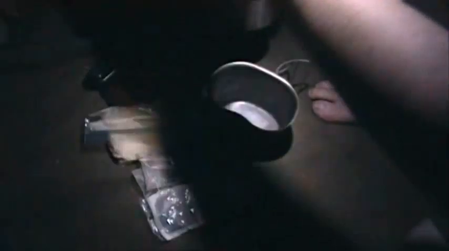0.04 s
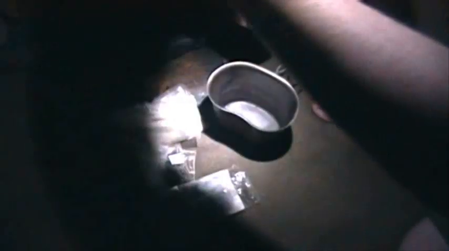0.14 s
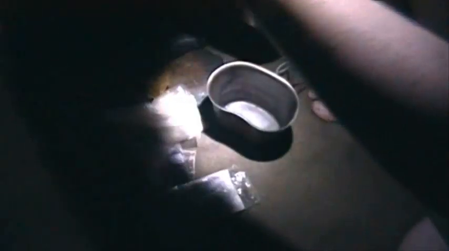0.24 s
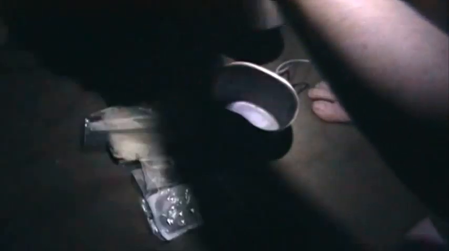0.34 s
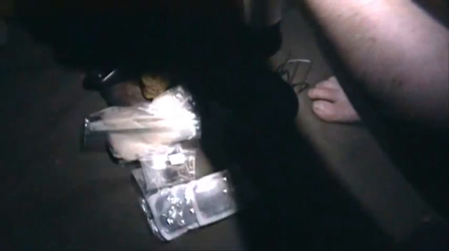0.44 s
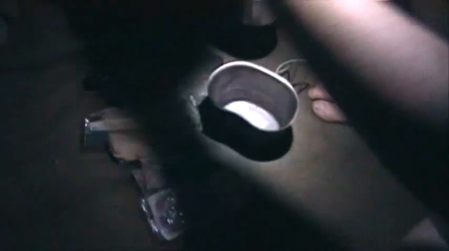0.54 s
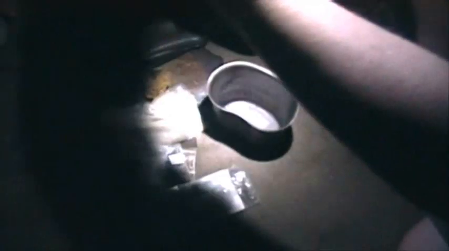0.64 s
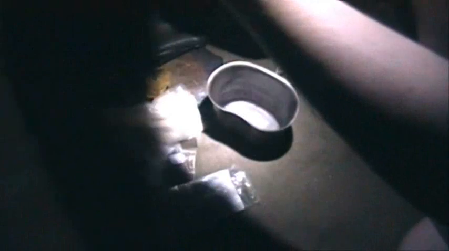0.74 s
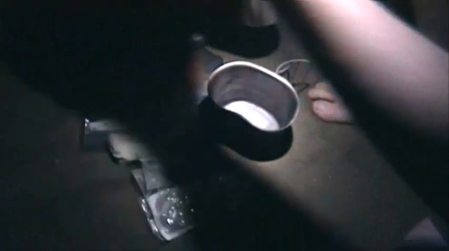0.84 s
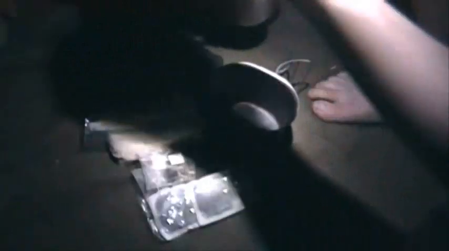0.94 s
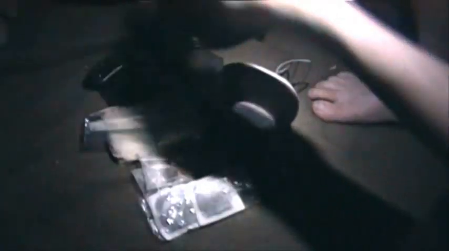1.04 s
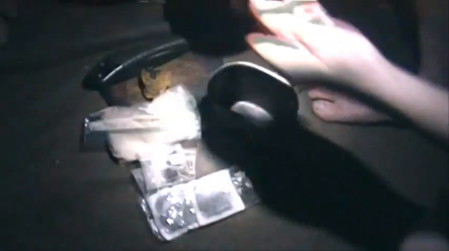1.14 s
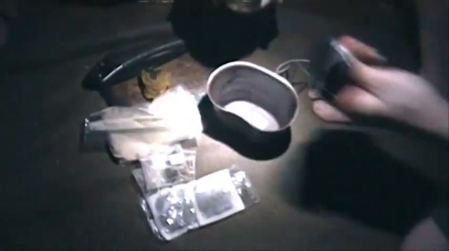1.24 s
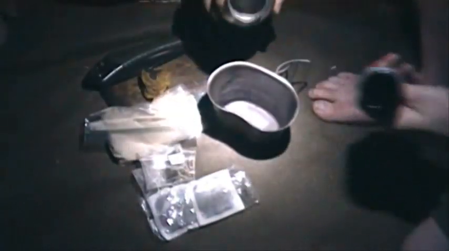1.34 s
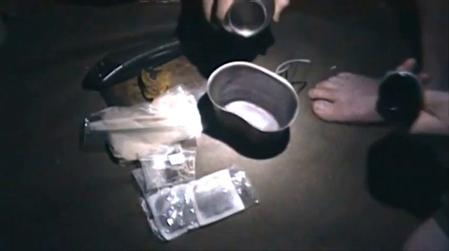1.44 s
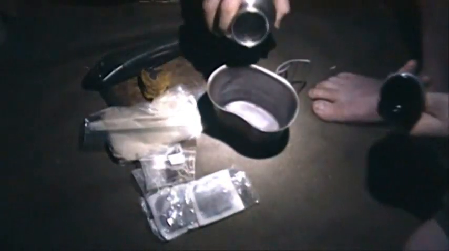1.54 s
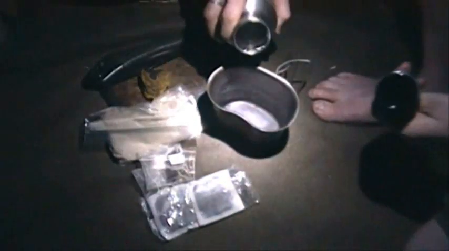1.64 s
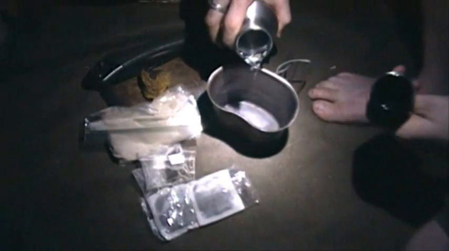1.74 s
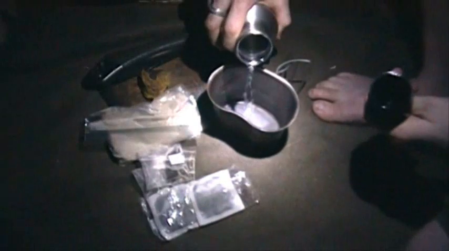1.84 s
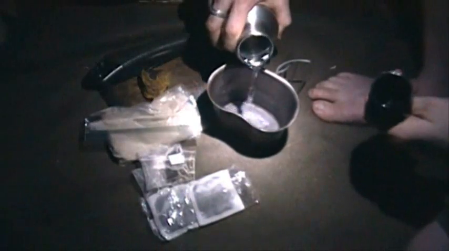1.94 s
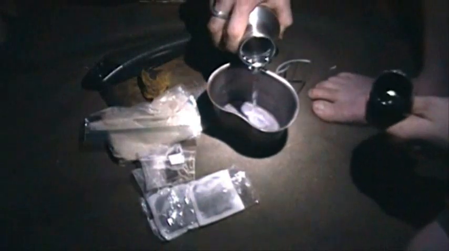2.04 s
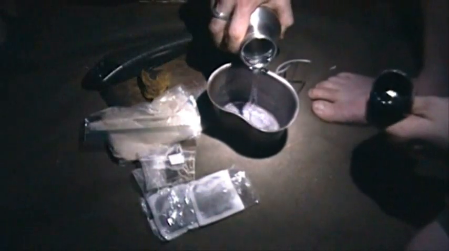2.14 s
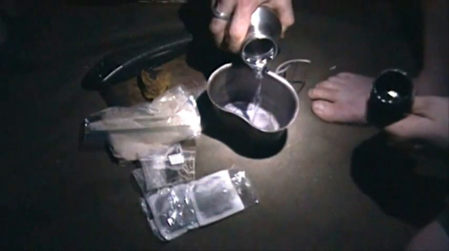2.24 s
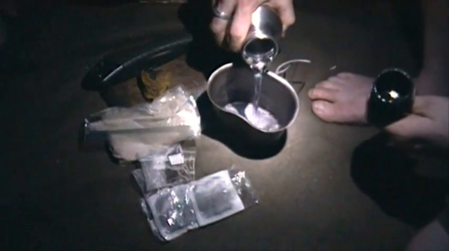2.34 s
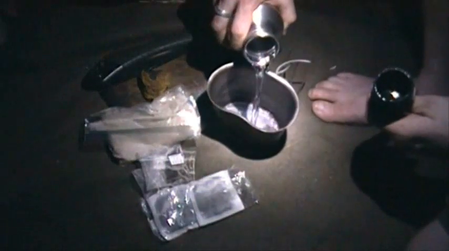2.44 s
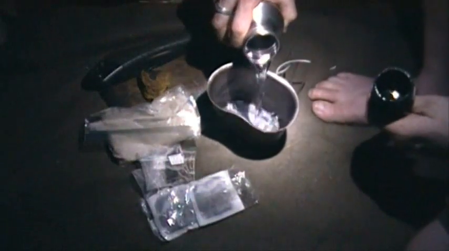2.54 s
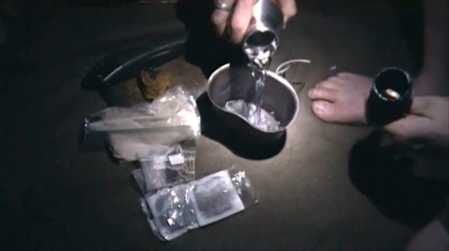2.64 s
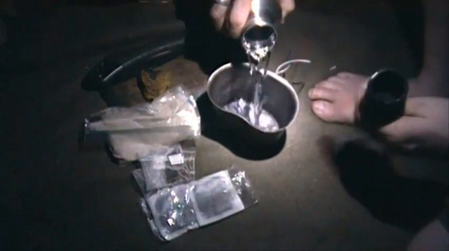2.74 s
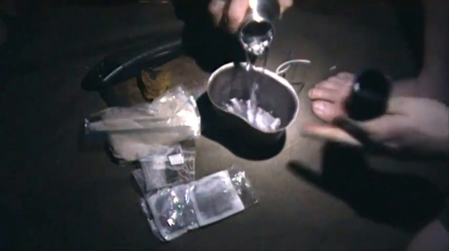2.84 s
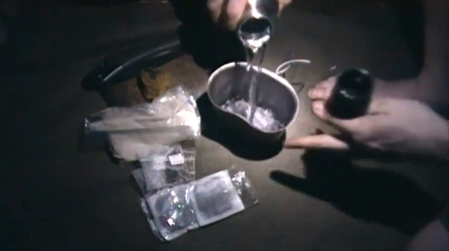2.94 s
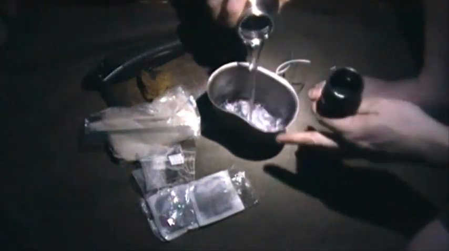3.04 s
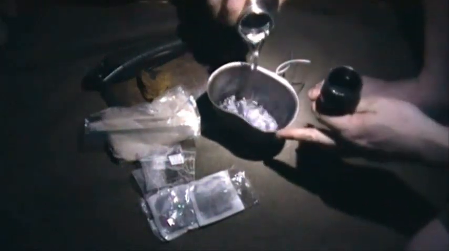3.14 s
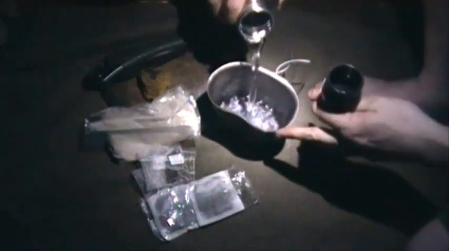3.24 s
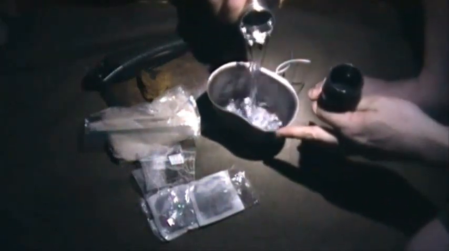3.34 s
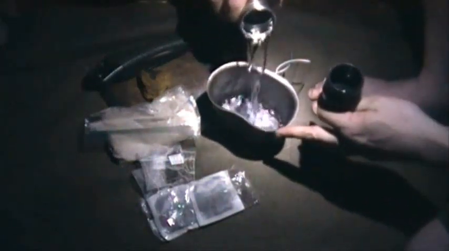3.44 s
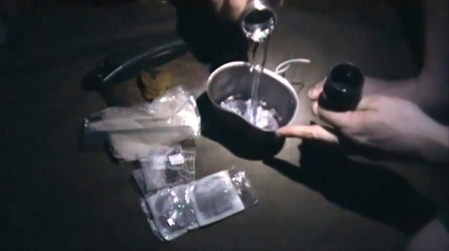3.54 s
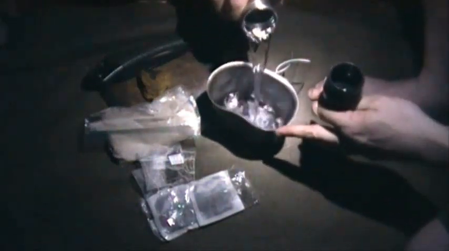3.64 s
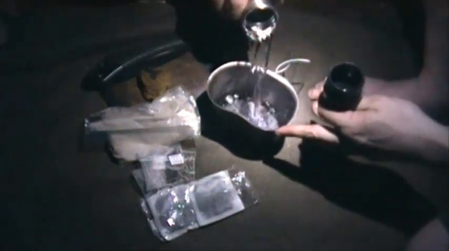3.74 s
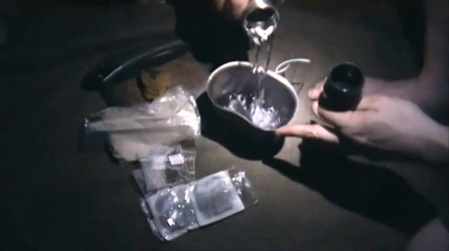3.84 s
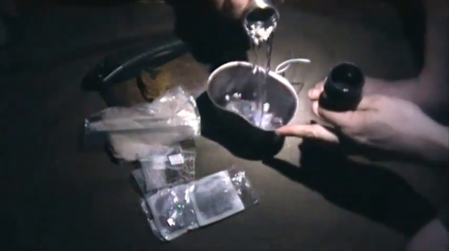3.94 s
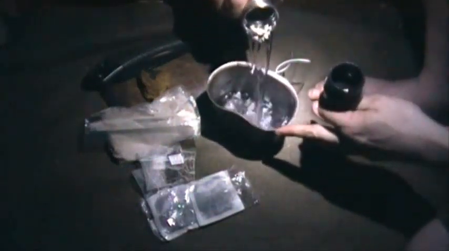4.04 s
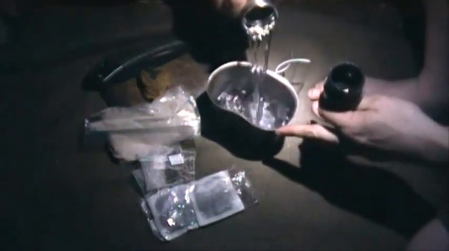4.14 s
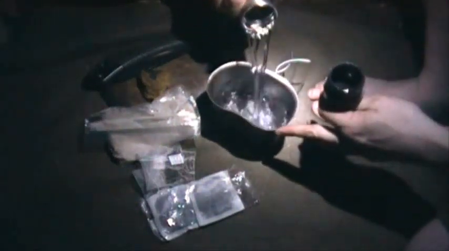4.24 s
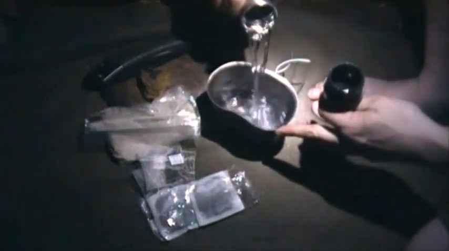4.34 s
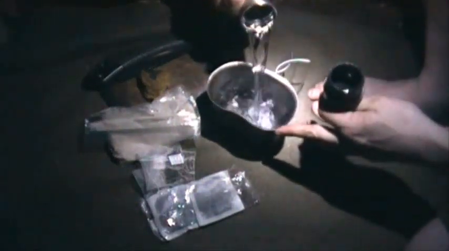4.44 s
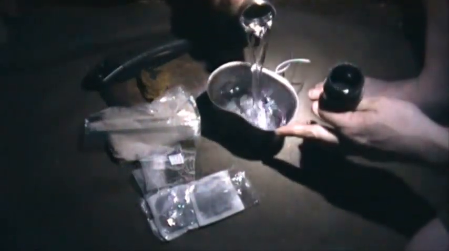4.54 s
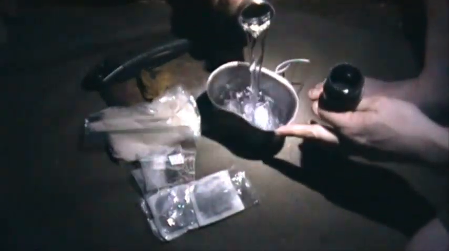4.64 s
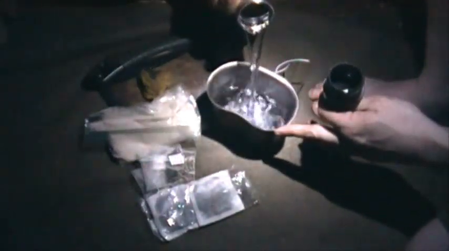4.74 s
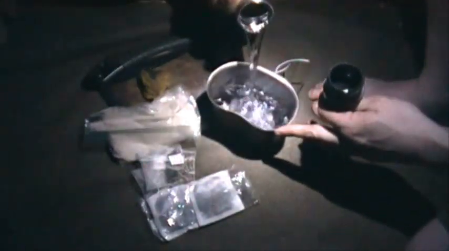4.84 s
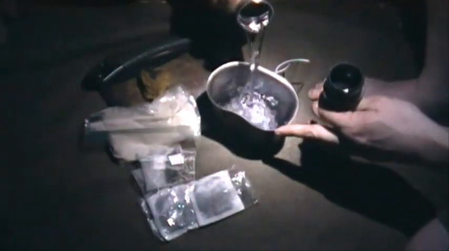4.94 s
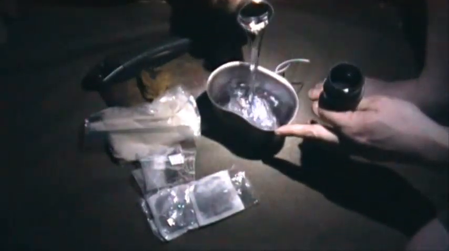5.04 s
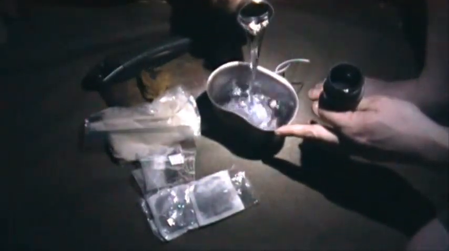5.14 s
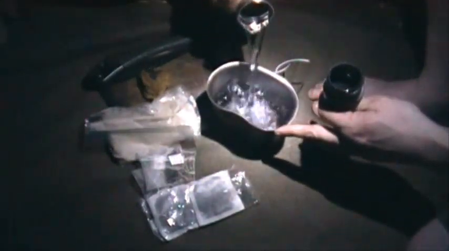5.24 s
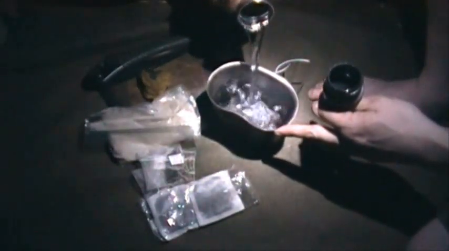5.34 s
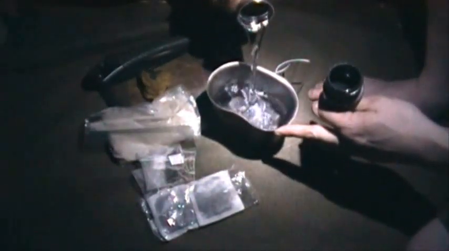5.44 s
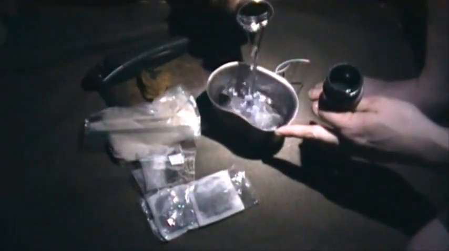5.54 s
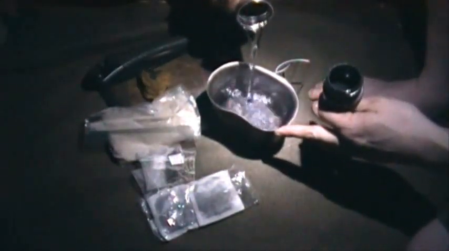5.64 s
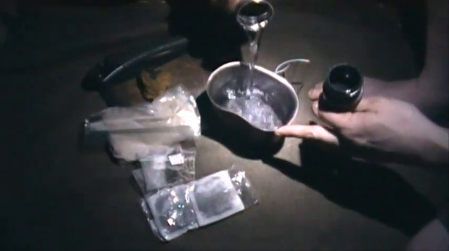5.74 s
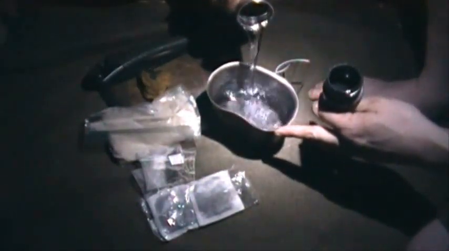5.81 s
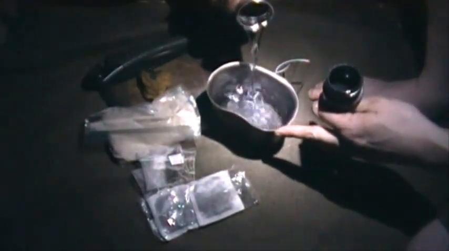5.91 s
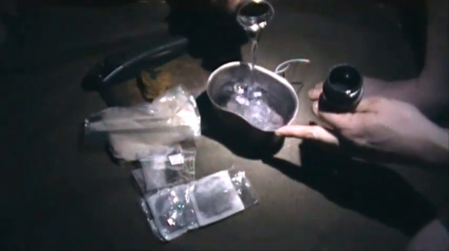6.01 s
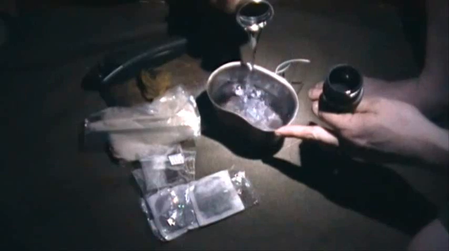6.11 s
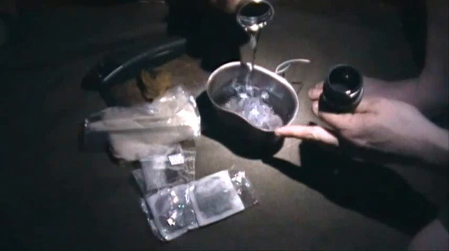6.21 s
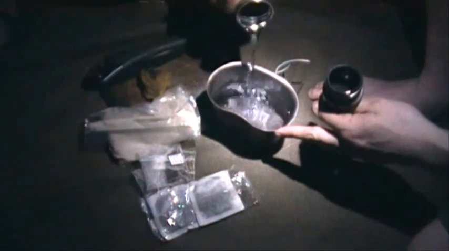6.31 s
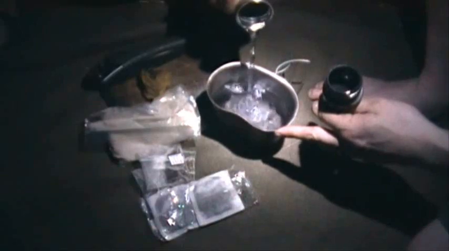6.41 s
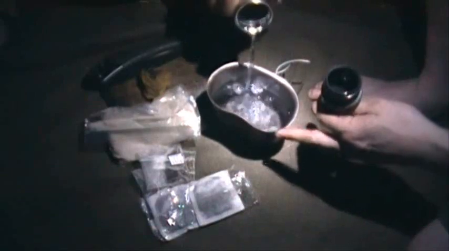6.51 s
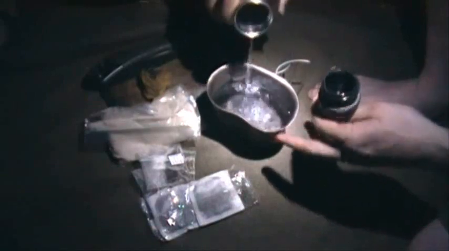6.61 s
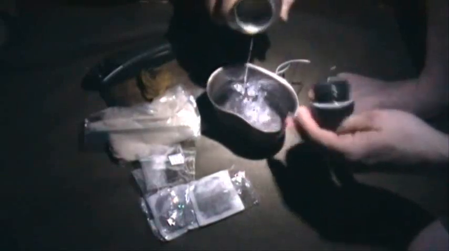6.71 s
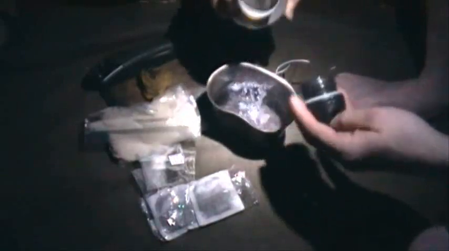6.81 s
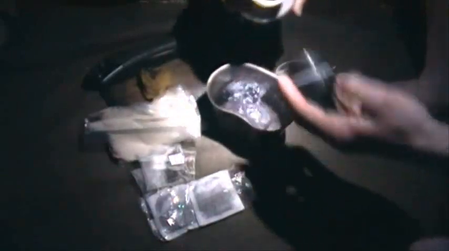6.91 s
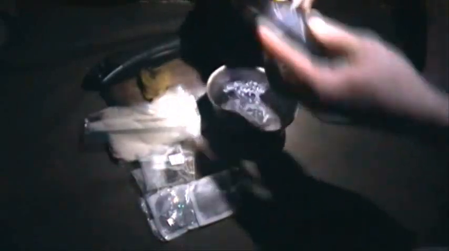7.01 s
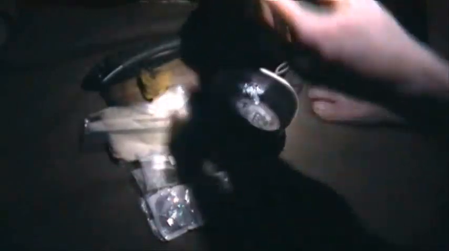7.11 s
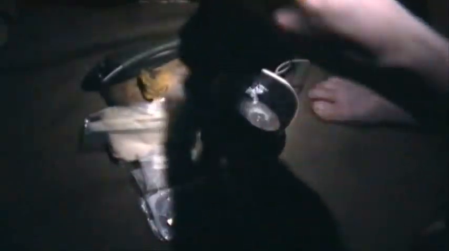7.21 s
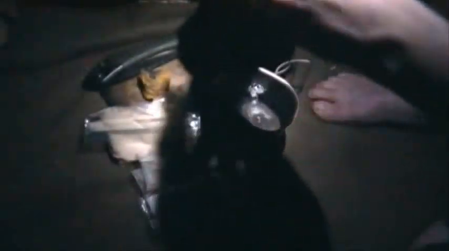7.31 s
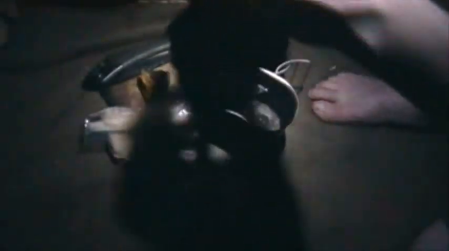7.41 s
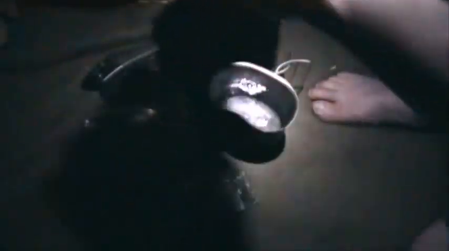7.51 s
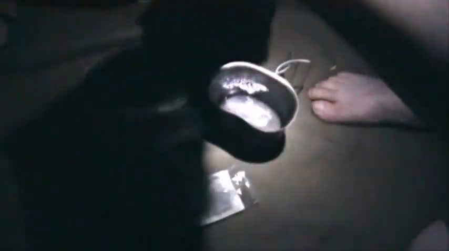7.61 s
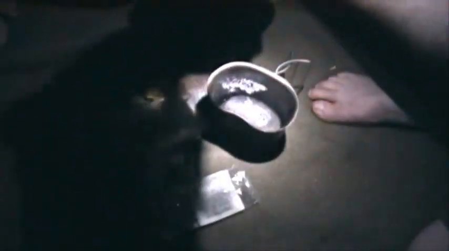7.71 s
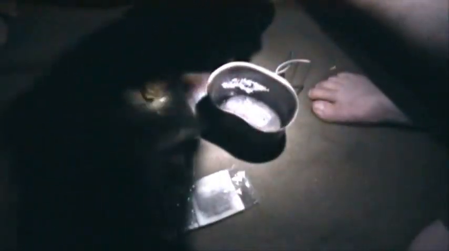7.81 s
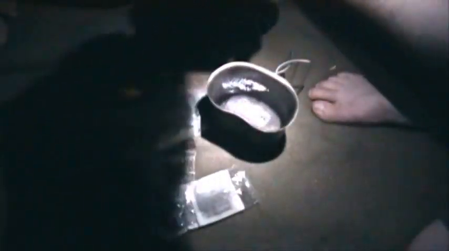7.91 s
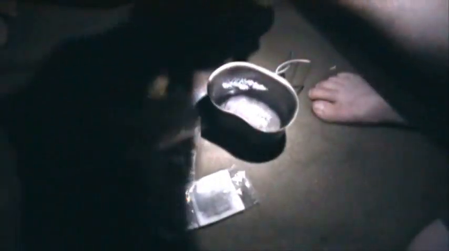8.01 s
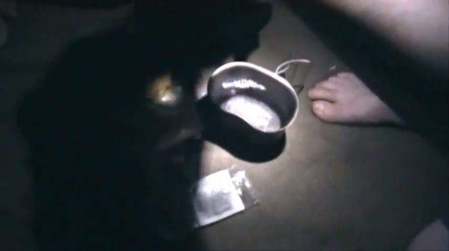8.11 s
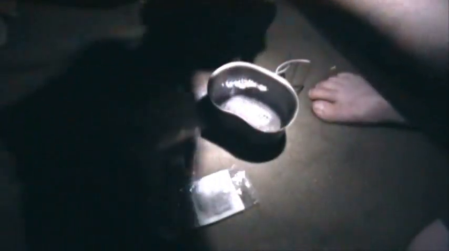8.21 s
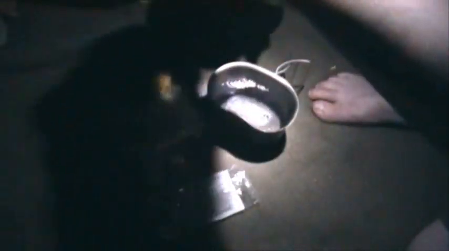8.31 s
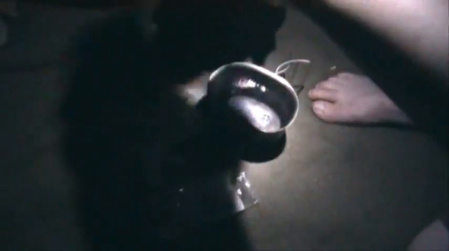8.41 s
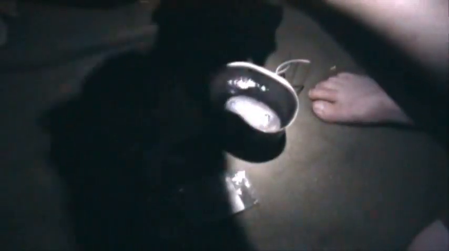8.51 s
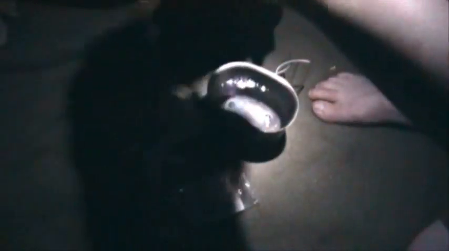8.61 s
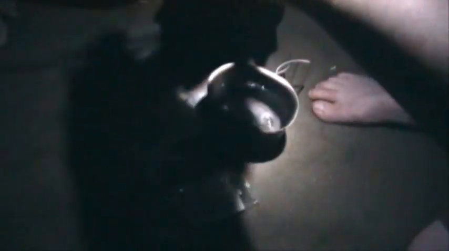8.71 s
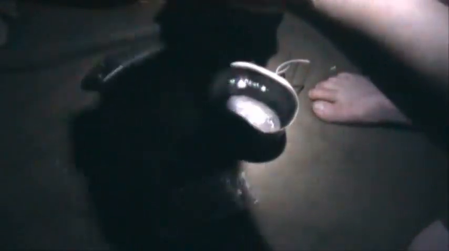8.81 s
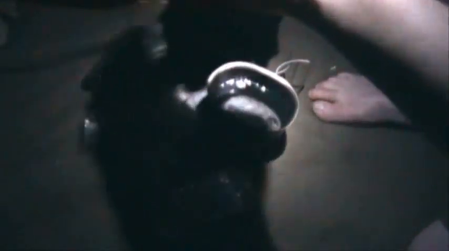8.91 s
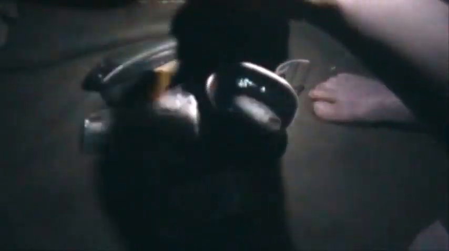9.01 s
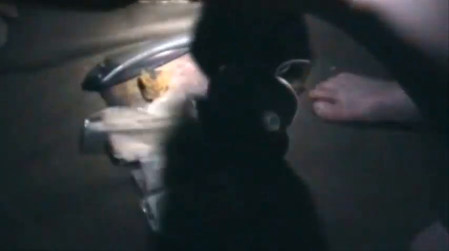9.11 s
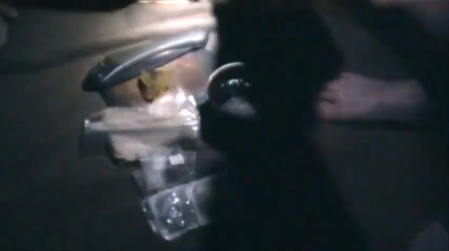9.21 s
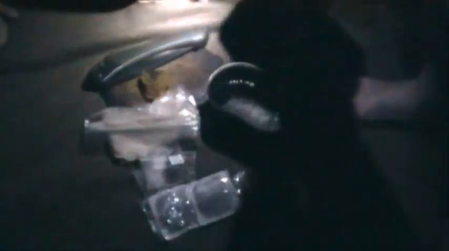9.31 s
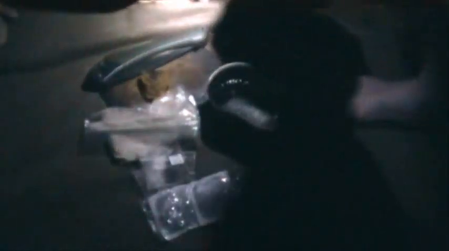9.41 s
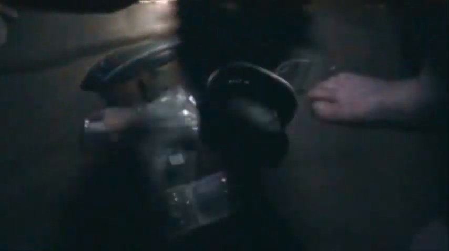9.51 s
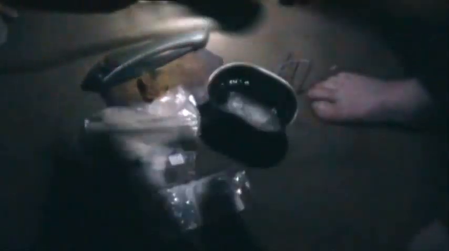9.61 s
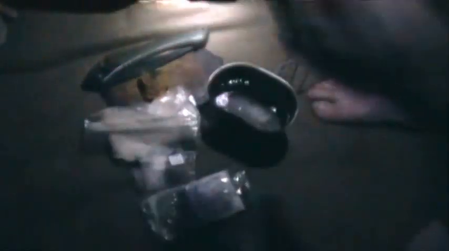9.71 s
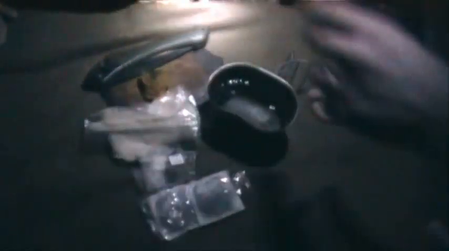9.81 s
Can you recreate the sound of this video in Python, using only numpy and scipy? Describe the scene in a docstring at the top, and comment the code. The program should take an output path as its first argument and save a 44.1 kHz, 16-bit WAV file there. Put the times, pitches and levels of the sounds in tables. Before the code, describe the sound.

Close up in a quiet tent, a steel bottle is opened, water spatters and gurgles into a metal cup, and the stopper is screwed back tight.

```python
"""In a tent at night a stopper is unscrewed from a steel bottle and pops out, and water is poured into a metal cup.
The stream spatters on the bare bottom, then burbles higher as the cup fills, while a low drone swells and fades.
The stopper is pushed back in with a hollow, sinking note, screwed down, and creaks tight.
Noise bursts and decaying sines make the metal, swarms of short sines the water, filtered noise the night."""
import sys
import numpy as np
from scipy import signal
from scipy.fft import rfft, irfft, next_fast_len
from scipy.io import wavfile
from scipy.ndimage import uniform_filter1d

SR = 44100
rng = np.random.default_rng(int(sys.argv[2]) if len(sys.argv) > 2 else 0)


def wav_out(sig):
    """Save sig, one row per channel (or a flat mono array), as 16-bit PCM at SR to the path in sys.argv[1]."""
    wavfile.write(sys.argv[1], SR, np.round(np.clip(np.atleast_2d(sig).T, -1, 1) * 32767).astype(np.int16))


N = 434826
TIME = np.arange(N) / SR
CUTOFF_HZ = 15700   # top of the final sound and of the bubble pitches
LEVEL_SPAN_S = 0.01


def from_db(db):
    """Decibels to gain."""
    return 10 ** (np.asarray(db) / 20)


def rms_one(x):
    """Scale to rms 1."""
    return x / np.sqrt(np.mean(x ** 2) + 1e-20)


def unit_burst(x):
    """Scale a short sound to the energy of rms 1 held for LEVEL_SPAN_S."""
    return x * np.sqrt(LEVEL_SPAN_S * SR / (np.sum(x ** 2) + 1e-20))


def in_time(rows):
    """The columns of a curve at every sample."""
    s, *columns = np.transpose(rows)
    return [np.interp(TIME, s, c) for c in columns]


def ramp(start_s, length_s):
    """Rise from 0 to 1 over this stretch of time."""
    return np.clip((TIME - start_s) / max(length_s, 1e-3), 0, 1)


def at_hz(points, hz):
    """Read a spectrum on a log-frequency axis."""
    point_hz, values = np.transpose(points)
    return np.interp(np.log(np.maximum(hz, 1)), np.log(point_hz), values)


def band(x, low_hz, high_hz, order=2):
    """Butterworth band-pass."""
    edges = [low_hz, min(high_hz, 0.45 * SR)]
    return signal.sosfilt(signal.butter(order, edges, "band", fs=SR, output="sos"), x + 1e-18)


def coloured(x, spectrum):
    """Pass through a short minimum-phase filter with this spectrum."""
    size = 1024
    hz = np.arange(size // 2 + 1) * SR / size
    cepstrum = irfft(np.log(from_db(at_hz(spectrum, hz))))
    # folding the cepstrum forward in time makes the filter causal
    fold = np.r_[1, np.full(size // 2 - 1, 2), np.zeros(size // 2)]
    taps = irfft(np.exp(rfft(cepstrum * fold)))
    return signal.oaconvolve(x, taps)[:N]


def drift(rate):
    """Random wander between normal draws, `rate` of them a second."""
    return np.interp(TIME * rate, np.arange(32768), rng.standard_normal(32768))


def dying(t, t60):
    """Envelope that falls 60 dB in t60."""
    return np.exp(-np.log(1000) * t / t60)


def ring(clicks, hz, t60):
    """Two-pole resonator: a unit click sets a decaying sine of height 1 ringing."""
    r, w = from_db(-60 / (t60 * SR)), 2 * np.pi * hz / SR
    return signal.lfilter([0, np.sin(w)], [1, -2 * r * np.cos(w), r * r], clicks + 1e-18)


def add(out, s, sound):
    """Mix a sound in at time s."""
    i = max(int(s * SR), 0)
    out[i:i + len(sound)] += sound[:max(N - i, 0)]


def evened(x, span_s):
    """Hold the slow level near rms 1 and keep the fine grain."""
    power = np.maximum(uniform_filter1d(x ** 2, int(span_s * SR)), 0)
    return x / np.sqrt(power + 0.01 * np.mean(x ** 2))


def grains(per_s, spread_db, clump_db):
    """Random clicks of uneven size and sign, with loudness that clumps."""
    size_db = spread_db * np.minimum(rng.exponential(1, N), 4) + clump_db * drift(110)
    sizes = from_db(size_db) * rng.choice([-1, 1], N)
    return sizes * (rng.random(N) < per_s / SR)


# background spectrum: f/Hz, density level/dB
NIGHT_SPECTRUM = [(12, -40), (20, -9), (70, -0.5), (98, -4), (140, -6.5), (252, -17), (282, -17),
                  (667, -23), (1200, -24), (2090, -28.5), (3080, -30), (4430, -30), (7310, -31.5),
                  (7950, -31), (15500, -43)]
# how alike left and right are: f/Hz, likeness (0 to 1)
NIGHT_LIKENESS = [(25, .55), (60, 0.87), (150, 0.97), (380, 0.73), (950, 0.71), (2380, 0.48), (5980, 0.47),
                  (15000, 0.61)]


def night(level_db):
    """Steady distant rumble and hiss, shaped noise that is less alike left and right in the treble."""
    size = next_fast_len(N)
    hz = np.arange(size // 2 + 1) * SR / size
    mid, side = rfft(rng.standard_normal((2, size))) * from_db(at_hz(NIGHT_SPECTRUM, hz))
    alike = np.clip(at_hz(NIGHT_LIKENESS, hz), -1, 1)
    both = np.sqrt(1 + alike) * mid + np.sqrt(1 - alike) * side * [[1], [-1]]
    balance_db = np.array([[-1.2], [1.0]])   # left, right
    return from_db(level_db + balance_db) * rms_one(irfft(both, size)[:, :N])


# limits of the thud, body, snap and fizz bands: f/Hz
CONTACT_BANDS = [250, 900, 2500, 8050, 15500]


def contact(levels_db, swell_s, t60, tail_db, tail_t60, grit_db):
    """A rough contact: a gritty crunch that swells, breaks off and leaves a short tail in the shell."""
    t = np.arange(SR // 9) / SR
    after = np.maximum(t - swell_s, 0)
    swell = np.minimum(t / max(swell_s, 1e-4) + 0.41, 1)
    shape = swell * (dying(after, t60) + from_db(tail_db) * dying(after, tail_t60))
    catches = np.interp(t / t[-1], np.linspace(0, 1, 300), rng.standard_normal(300))
    grit = from_db(grit_db * catches * dying(t, 0.33))
    forces = rng.standard_normal((len(levels_db), len(t))) * shape * grit
    crunch = np.zeros(len(t))
    for force, db, low, high in zip(forces, levels_db, CONTACT_BANDS, CONTACT_BANDS[1:]):
        crunch += from_db(db) * unit_burst(band(force, low, high, order=4))
    return crunch


# stopper and bottle knocking together:
# t/s, level/dB before trims, hardness/dB per band, swell/s, ring f/Hz, ring level/dB
STOPPER_KNOCKS = [(0.099, -34, -11, .0011, 1810, -28), (0.121, -34, -5, 0.0021, 1790, -34),
                  (0.146, -15.5, -2, .004, 3720, -20), (0.248, -17, .5, .002, 2860, -22),
                  (0.357, -35, -5, 0.0015, 1800, -37), (0.384, -44, 2, .0006, 4200, -28.5),
                  (0.41, -21.5, -0.5, 0.0031, 1753, -24), (0.511, -31, -4.5, 0.0011, 2880, -36),
                  (0.609, -24.5, -4.5, 0.0047, 1180, -34), (0.648, -14.5, -3.5, 0.0036, 1780, -16),
                  (0.6566, -17.5, 6, 0.0012, 3200, -20), (0.736, -24, -3, 0.0016, 1890, -35),
                  (0.823, -33.5, -5, 0.0018, 2190, -31), (1.081, -20.5, 3.5, .003, 5480, -29),
                  (1.132, -20.5, -0.5, 0.0013, 2940, -20), (1.186, -19, 2, 0.0025, 1770, -14),
                  (1.262, -25.5, -1.5, 0.00035, 1760, -32), (1.896, -42.5, 6, .0014, 3160, -47),
                  (2.232, -35, -1, 0.0025, 1980, -54), (7.252, -25, 5, .003, 3300, -28),
                  (7.412, -14, -6, 0.0011, 1125, -16), (7.462, -37, -5, 0.0046, 695, -32),
                  (7.621, -16.5, -5.5, 0.0016, 1350, -23), (7.736, -13, 2, .0065, 3400, -21),
                  (7.94, -40, -3, .002, 1150, -41), (8.164, -37, -3, 0.002, 1116, -46),
                  (8.534, -28.5, 0.5, .0008, 1590, -38), (8.543, -20.5, 0, .0056, 3010, -35),
                  (8.636, -13, -2, .0004, 3800, -22), (8.755, -33, -5, 0.0002, 1105, -35),
                  (8.792, -18, 7.5, .0014, 7000, -26), (8.886, -30, -2, 0.0006, 2160, -48),
                  (8.921, -27.5, -4, .0057, 1094, -29), (8.947, -19.5, 1, 0.0015, 2040, -24),
                  (8.968, -16.5, 1, 0.002, 1107, -27), (9.151, -12.5, .5, .0012, 1124, -20),
                  (9.17, -23, -3, .0004, 1120, -38), (9.196, -18, 0.5, 0.0019, 1550, -26),
                  (9.794, -27.5, -1, 0.0016, 1300, -32)]
# thud, body, snap and fizz of a knock of middling hardness: relative level/dB
KNOCK_BALANCE = [-10.5, -1.5, 0.5, -13.5]
# what the bottle rings with: f/Hz, relative level/dB, t60/s
BOTTLE_MODES = [(444, -2.5, 0.1), (688, -6.5, 0.14), (907, -12, 0.053), (1090, -8, 0.062),
                (1380, -17, 0.52), (1570, -20.5, 0.5), (1770, -6.5, 0.15), (1970, -13, .15),
                (2300, -12, 0.15), (2700, -23, 0.12), (2940, -7, 0.092), (3500, -0.5, 0.089),
                (4050, 3, 0.075), (4830, 0, 0.071), (5400, -7, 0.071), (6300, -12, 0.057), (7360, -16, .07)]


def knocks(crunch_db, main_cycles, shell_db):
    """Each knock crunches, brighter if harder, rings a pitch set by where it touches, and wakes the bottle's modes."""
    out, t = np.zeros(N), np.arange(SR // 4) / SR
    modes = np.array([from_db(db) * np.sin(2 * np.pi * hz * t) * dying(t, t60)
                      for hz, db, t60 in BOTTLE_MODES])
    # hardness tilts the bands about a pivot just above the body band, towards the snap
    bands_from_pivot = np.arange(len(KNOCK_BALANCE)) - (len(KNOCK_BALANCE) - 1.5) / 2
    for s, db, hardness_db, swell_s, hz, ring_db in STOPPER_KNOCKS:
        levels_db = db + np.array(KNOCK_BALANCE) + hardness_db * bands_from_pivot
        crunch = contact(levels_db, swell_s, t60=0.026, tail_db=-12, tail_t60=0.07, grit_db=3.5)
        add(out, s, from_db(crunch_db) * crunch)
        main_ring = unit_burst(np.sin(2 * np.pi * hz * t) * dying(t, main_cycles / hz))
        add(out, s + swell_s / 2, from_db(ring_db) * main_ring)
        strengths = rng.uniform(0.6, 1, len(modes)) * rng.choice([-1, 1], len(modes))
        add(out, s + swell_s, from_db(levels_db[1] + shell_db) * (strengths @ modes))
    return out


# twists of the hand on stopper and bottle: start t/s, length/s, level/dB before trims
HAND_TWISTS = [(.11, .14, -33), (.32, 0.13, -37), (.54, 0.07, -33.5), (1.004, 0.18, -33.5),
               (7.43, 0.2, -38), (7.79, 0.23, -39.5), (8.267, 0.15, -42), (8.562, 0.072, -33),
               (8.88, 0.11, -29)]
# spectrum of the rub: f/Hz, density level/dB
RUB_SPECTRUM = [(200, 5), (450, -1.5), (900, 1), (1800, 1.5), (4000, 0.5), (7500, 2), (10000, -11.5),
                (15500, -8)]
TWIST_ATTACK_S, TWIST_RELEASE_T60_S = 0.036, 0.19
# faint rustle while the hand rests on the stopper
GRIP_DB, HAND_OFF_S, HAND_ON_S = -50.5, 1.28, 7.5


def rubbing(level_db, shell_db):
    """With each twist, fine catches of hand and stopper hiss and keep the bottle's modes faintly ringing."""
    pressure = from_db(GRIP_DB) * ((TIME < HAND_OFF_S) | (TIME > HAND_ON_S))
    for s, length_s, db in HAND_TWISTS:
        release = dying(np.clip(TIME - s - length_s, 0, 1), TWIST_RELEASE_T60_S)
        pressure = np.maximum(pressure, from_db(db) * ramp(s, TWIST_ATTACK_S) * release)
    catches = coloured(grains(per_s=8300, spread_db=3.0, clump_db=3.5), RUB_SPECTRUM)
    rub = pressure * rms_one(band(catches, 210, 17000))
    shell = sum(from_db(db) * ring(rub, hz, t60) for hz, db, t60 in BOTTLE_MODES if hz < 3000)
    return from_db(level_db) * rub + from_db(shell_db) * shell


# low, quickly damped tones, many sounding under the stopper knocks: t/s, approximate peak level/dB, f/Hz, t60/s
DAMPED_TONES = [(0.411, -31, 415, .09), (0.652, -22, 200, .04), (3.385, -25.5, 45, 0.095),
                (4.419, -25, 32, 0.13), (4.505, -24, 42, 0.17), (4.507, -33, 470.6, 0.09),
                (4.706, -26, 472, 0.063), (7.413, -15, 860, .04), (7.622, -19, 800, .04),
                (8.168, -37.5, 658.6, 0.094), (8.545, -27.5, 645, .09), (8.636, -26, 180, 0.05),
                (9.152, -27, 600, .07), (9.197, -27.5, 487, 0.17)]


def damped_tones():
    """Low, quickly damped tones, many under the stopper knocks: soft-edged decaying sines."""
    out, t = np.zeros(N), np.arange(SR // 4) / SR
    for s, db, hz, t60 in DAMPED_TONES:
        shape = dying(t, t60) * (1 - dying(t, t60 / 4))
        add(out, s, 2 * from_db(db) * np.sin(2 * np.pi * hz * t) * shape)
    return out


# air in the neck as the stopper is drawn and pops out (rising), then goes home in three pushes (sinking):
# t/s, level/dB, starting f/Hz, glide/Hz per s, hold/s, t60/s
AIR_NOTES = [(1.199, -32.5, 412, 3800, 0.032, 0.15), (1.258, -18, 626, 250, 0.019, .13),
             (7.415, -15.5, 326, -67, 0.077, 0.3), (7.622, -19, 302, -520, 0.0053, 0.22),
             (7.74, -31.5, 203, -750, 0.011, 0.13)]
NECK_ATTACK_S = 0.0038


def neck(overtone_db):
    """Each move of the stopper sounds a hollow, gliding note that holds while it slides and then dies."""
    out = np.zeros(N)
    for s, db, hz, glide, hold_s, t60 in AIR_NOTES:
        t = np.arange(int((hold_s + t60) * SR)) / SR
        phase = 2 * np.pi * np.cumsum(hz + glide * t) / SR
        shape = np.minimum(t / NECK_ATTACK_S, 1) * dying(np.maximum(t - hold_s, 0), t60)
        note = np.sin(phase) + from_db(overtone_db) * np.sin(2 * phase)
        add(out, s, np.sqrt(2) * from_db(db) * shape * note)
    return out


def bubble(hz, t60, rise):
    """A bubble rings briefly; its pitch climbs by a share as it reaches the surface."""
    t = np.arange(int(t60 * SR) + 2) / SR
    fall = dying(t, t60)
    return np.sin(2 * np.pi * hz * np.cumsum(1 + rise * (1 - fall)) / SR) * fall


# single loud drops: t/s, level/dB before trims, f/Hz, splat level/dB relative to the drop
LOUD_DROPS = [(2.604, -13, 3360, -15.5), (2.646, -17, 5560, -6.5), (2.67, -17.5, 6600, -6),
              (2.877, -23, 7200, -5.5), (3.027, -16, 7570, -7), (3.064, -16, 805, -6),
              (3.094, -15.5, 2030, -3), (3.338, -10, 3630, -16), (3.49, -8, 966, -29),
              (3.576, -5.5, 8400, -8.5), (3.68, -15, 7680, -9), (3.906, -15.5, 5360, -8),
              (4.114, -10, 4440, -11), (4.122, -9.5, 907, -11.5), (4.303, -8, 4950, -11.5),
              (4.407, -4.5, 3320, -18), (4.473, -8.5, 7400, -8), (4.618, -12.5, 953, -7),
              (4.71, -11, 1100, -14), (4.914, -15.5, 2550, -24), (5.423, -13, 3490, -17),
              (5.514, -12.5, 1400, -19), (5.585, -14, 1370, -27), (5.945, -15, 7430, -9.5),
              (6.108, -10, 3700, -23), (6.729, -11.5, 4380, -14), (6.776, -16.5, 1460, -9),
              (6.831, -14.5, 2810, -10), (7.059, -14, 1500, -8), (7.132, -20, 1430, -7)]
# clear plinks of slow drips around the start and end of the pour: t/s, level/dB, f/Hz, t60/s, pitch rise (share)
DRIP_PLINKS = [(2.514, -33, 3500, 0.039, 0.013), (2.733, -22.5, 3910, 0.086, 0.012),
               (2.765, -25, 1870, 0.038, 0.011), (2.804, -30, 3350, 0.063, .01),
               (7.02, -25, 2000, 0.04, 0.59), (7.033, -22, 1450, .03, .3), (7.081, -15, 1500, .022, .15),
               (7.1015, -9, 1400, 0.027, 0.7), (7.108, -19.5, 1464, 0.062, 0.011),
               (7.112, -39, 2370, 0.11, .01)]


def drops(plink_db, splash_db, splat_t60):
    """A loud drop splats as a noise burst and traps one bubble; a slow drip only plinks."""
    out, t = np.zeros(N), np.arange(SR // 20) / SR
    for s, db, hz, splat_db in LOUD_DROPS:
        burst = rng.standard_normal(len(t)) * dying(t, splat_t60)
        splat = unit_burst(band(burst, 0.89 * hz, 4500 + 0.43 * hz, order=1))
        add(out, s, from_db(db + splat_db + splash_db) * splat)
        add(out, s, from_db(db + plink_db) * bubble(hz, t60=1.56 / np.sqrt(hz), rise=0.015))
    for s, db, hz, t60, rise in DRIP_PLINKS:
        add(out, s, from_db(db) * bubble(hz, t60, rise))
    return out


# strength of the stream, a first dribble, the full pour, a thinning and a last slop: t/s, level/dB before surges
STREAM_FLOW = [(2.58, -51), (2.64, -41), (2.8, -46), (2.9, -52), (3.01, -48), (3.05, -38.5), (3.62, -35),
               (3.82, -38), (3.97, -34.5), (4.25, -38), (4.72, -38), (5.45, -34.5), (6.32, -42.5),
               (6.48, -34.5), (6.64, -43.5), (7.03, -32.5), (7.1, -53), (7.2, -65)]


def bubbles(centre_hz, octaves, per_s, cycles, spread_db):
    """A swarm of bubbles, born in clusters and scattered in pitch round a centre; slow level near 1."""
    out, cluster, wander = np.zeros(N), from_db(6 * drift(45)), drift(22)
    start, end = STREAM_FLOW[0][0], STREAM_FLOW[-1][0]
    for when, size, pitch, turn, life in rng.random((int(per_s * (end - start)), 5)):
        s = start + when * (end - start)
        i = int(s * SR)
        # two uniform draws make one normal draw
        scatter = np.sqrt(-2 * np.log(1 - pitch)) * np.cos(2 * np.pi * turn)
        hz = min(centre_hz[i] * 2 ** (octaves * (scatter + 0.5 * wander[i])), CUTOFF_HZ)
        size_db = spread_db * min(-np.log(1 - size), 3.5)
        gain = cluster[i] * from_db(size_db) * np.sign(turn - 0.5)
        add(out, s, gain * bubble(hz, t60=cycles * (0.5 + life) / hz, rise=0.025))
    return evened(out, span_s=0.084)


# main resonance of the cup, climbing as it fills: t/s, f/Hz
CUP_RESONANCE = [(3.1, 770), (3.6, 830), (4.15, 900), (4.5, 1000), (4.95, 1080), (5.45, 1380), (6, 1480),
                 (7.1, 1480)]
# spectrum of the spray: f/Hz, density level/dB
SPRAY_SPECTRUM = [(300, -26), (700, -35), (1500, 6.5), (3000, 0.5), (5000, 3), (7800, 3.5), (10000, -5),
                  (12500, -5), (15500, -6)]
# the bottle gulps air and a slug of water plunges into the pool: t/s, big-bubble boost level/dB
BOTTLE_GLUGS = [(3.56, 8.5), (4.13, 9), (4.42, 9.5), (4.8, 2), (5.56, 6), (7.06, 6)]
GLUG_S = 0.075   # from the peak of a glug to 1/e of its boost
POOL_FORMS_S, POOL_DEEP_S, SHALLOW_LOSS_DB = 3.55, 4.1, 9   # big bubbles need a pool to form in
COVERED_S, COVERING_S = 4.7, 0.066   # from here on water covers the bottom and cushions the stream
CUSHION_SPRAY_DB, CUSHION_GURGLE_DB = 10.5, 5   # loss once it is covered
BREAKUP_S, BREAKUP_LENGTH_S = 5.8, 0.5   # the thinning stream breaks into drops
BREAKUP_SPRAY_DB, BREAKUP_FIZZ_LOSS_DB = 4, 4.5   # it then splashes more and drags less air under


def pour(gurgle_db, slosh_db, fizz_db, spray_db, mist_db, surge_db):
    """One surging stream drives big bubbles at the cup's resonance, small ones above, and spray on the steel."""
    flow_db, = in_time(STREAM_FLOW)
    cup_hz, = in_time(CUP_RESONANCE)
    shallow = 1 - ramp(POOL_FORMS_S, POOL_DEEP_S - POOL_FORMS_S)
    covered = ramp(COVERED_S, COVERING_S)
    broken = ramp(BREAKUP_S, BREAKUP_LENGTH_S)

    gurgle = bubbles(cup_hz, octaves=0.12, per_s=600, cycles=43, spread_db=4.5)
    slosh = bubbles(np.full(N, 1550), octaves=0.351, per_s=420, cycles=50, spread_db=9.0)
    fizz = bubbles(np.full(N, 3350), octaves=0.24, per_s=1100, cycles=38, spread_db=5.0)
    small = from_db(fizz_db - BREAKUP_FIZZ_LOSS_DB * broken) * fizz

    clicks = grains(per_s=4000, spread_db=3.8, clump_db=4.2)
    patter = evened(coloured(clicks, SPRAY_SPECTRUM), span_s=0.082)
    mist = bubbles(np.full(N, 6200), octaves=0.304, per_s=200, cycles=72, spread_db=7.5)
    spray_gain = from_db(BREAKUP_SPRAY_DB * broken - CUSHION_SPRAY_DB * covered)
    spray = spray_gain * (from_db(spray_db) * patter + from_db(mist_db) * mist)

    glug_db = sum(db * np.exp(-((TIME - s) / GLUG_S) ** 2) for s, db in BOTTLE_GLUGS)
    big_gain = from_db(glug_db - SHALLOW_LOSS_DB * shallow - CUSHION_GURGLE_DB * covered)
    big = big_gain * (from_db(gurgle_db) * gurgle + from_db(slosh_db) * slosh)
    flowing = (TIME > STREAM_FLOW[0][0]) & (TIME < STREAM_FLOW[-1][0])
    return flowing * from_db(flow_db + surge_db * drift(20)) * (big + small + spray)


# low drone: t/s, f/Hz, level/dB
LOW_DRONE = [(3.0, 99, -58), (3.35, 101.8, -38), (3.75, 107.2, -32.5), (4.15, 113, -36), (4.52, 113.6, -38),
             (4.62, 110, -58)]


def drone(overtone_db):
    """A gliding low note with a faint octave, silent outside its curve."""
    hz, db = in_time(LOW_DRONE)
    phase = 2 * np.pi * np.cumsum(hz) / SR
    sounding = (TIME > LOW_DRONE[0][0]) & (TIME < LOW_DRONE[-1][0])
    note = np.sin(phase) + from_db(overtone_db) * np.sin(2 * phase)
    return np.sqrt(2) * sounding * from_db(db) * note


# free ringing of the air column in the open neck: f/Hz, peak level/dB, t60/s
NECK_AIR_MODES = [(1465, -20.5, 0.11), (2660, -17, 0.11), (3060, -13, .03), (4500, -24, 0.09), (5100, -21, 0.05),
                  (6750, -26, .06)]
RIM_S = 7.253   # the stopper first touches the open mouth


def clink():
    """One touch at the open mouth sets the air in the neck ringing in its modes."""
    touch = np.zeros(N)
    touch[int(RIM_S * SR)] = 1
    return sum(from_db(db) * ring(touch, hz, t60) for hz, db, t60 in NECK_AIR_MODES)


# the tightening thread sticks and slips, ever more slowly: t/s, level/dB before trims, swell/s
THREAD_SLIPS = [(9.533, -17, .0054), (9.551, -14.5, 0.0063), (9.569, -15, 0.0044), (9.589, -13.5, .0016),
                (9.608, -13, 0.0063), (9.63, -10, 0.005), (9.654, -10.5, 0.0034), (9.682, -11.5, .002)]
# thud, body, snap and fizz of a slip: relative level/dB
SLIP_BALANCE = [-28.5, -18.5, 0, -17]


def creak(level_db, low_mode_db, high_mode_db):
    """Slips of the tight thread, each a short rasp that rings two damped modes of the stopper."""
    rasp = np.zeros(N)
    for s, db, swell_s in THREAD_SLIPS:
        levels_db = db + np.array(SLIP_BALANCE)
        add(rasp, s, contact(levels_db, swell_s, t60=0.035, tail_db=-9, tail_t60=0.068, grit_db=0.0))
    low_mode = from_db(low_mode_db) * ring(rasp, hz=2330, t60=0.0073)
    high_mode = from_db(high_mode_db) * ring(rasp, hz=4140, t60=0.014)
    return from_db(level_db) * rasp + low_mode + high_mode


def tent(x, wet_db, t60, side_db):
    """Fabric gives a faint, short tail; the treble scatters left and right from moment to moment."""
    t = np.arange(SR // 3) / SR
    tail = band(rng.standard_normal(len(t)) * dying(t, t60) * (t > 0.004), 270, 11200)
    wet = signal.oaconvolve(x, tail / np.sqrt(np.sum(tail ** 2)))[:N]
    side = band(x, 6500, 15500, order=1) * drift(900)
    return x + from_db(wet_db) * wet + from_db(side_db) * side * [[1], [-1]]


def scene():
    """Bottle and water sound inside the tent; drone, damped tones and night join without its tail."""
    stopper = knocks(crunch_db=-2.0, main_cycles=75, shell_db=-7.5) + clink()
    stopper += creak(level_db=-2.0, low_mode_db=-20.5, high_mode_db=-30.5)
    stopper += rubbing(level_db=0.5, shell_db=-43.5)
    water = pour(gurgle_db=-1, slosh_db=-4, fizz_db=0, spray_db=0.2, mist_db=-1.5, surge_db=2.04)
    water += drops(plink_db=-7.5, splash_db=-6, splat_t60=0.025)
    near = stopper + neck(overtone_db=-30) + water
    inside = tent(near, wet_db=-17, t60=0.19, side_db=-5.2)
    return inside + drone(overtone_db=-13.5) + damped_tones() + night(level_db=-37.5)


def record(dry):
    """Peaks beyond full scale are clipped flat, then a steep low-pass cuts the top."""
    low_pass = signal.ellip(12, 0.1, 90, CUTOFF_HZ, fs=SR, output="sos")
    return signal.sosfilt(low_pass, np.clip(dry, -1, 1))


dry = scene()
out = record(dry)
wav_out(out)
```